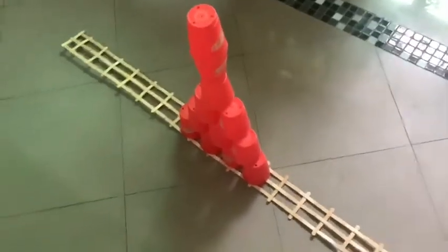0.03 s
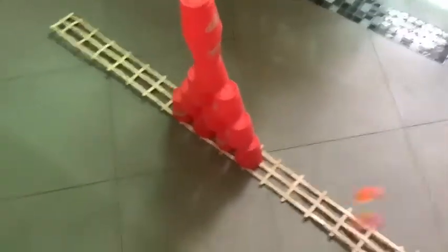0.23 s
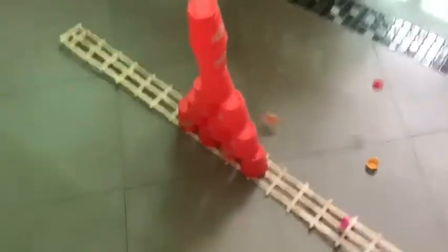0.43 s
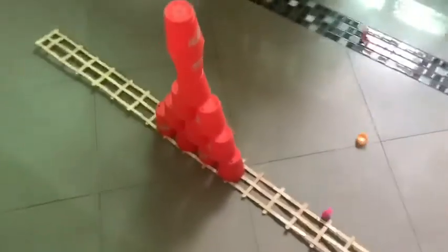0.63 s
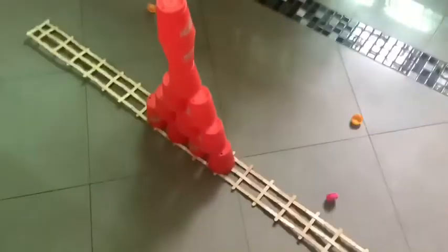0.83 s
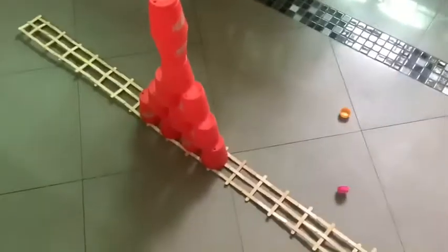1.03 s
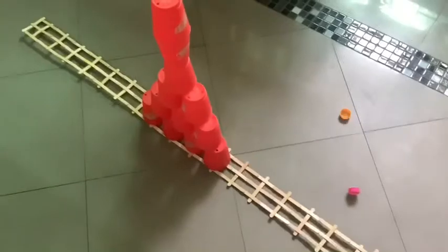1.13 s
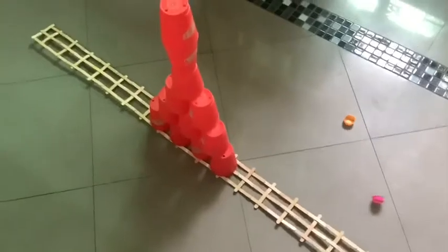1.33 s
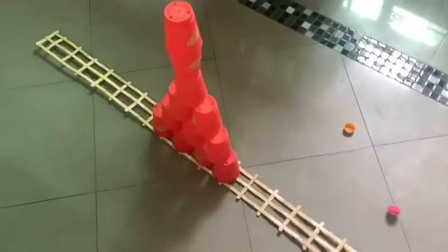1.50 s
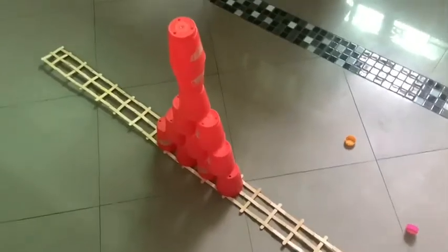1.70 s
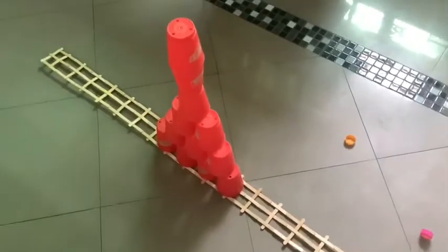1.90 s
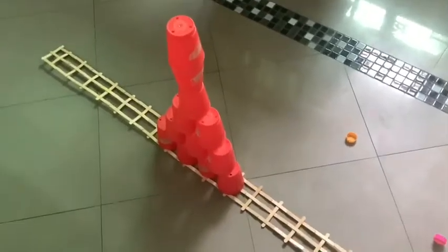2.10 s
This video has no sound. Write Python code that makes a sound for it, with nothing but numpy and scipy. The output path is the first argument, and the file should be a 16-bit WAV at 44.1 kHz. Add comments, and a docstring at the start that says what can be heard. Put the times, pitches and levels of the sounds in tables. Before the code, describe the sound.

Two plastic pieces clatter on tile and bounce to rest in an echoing room.

```python
"""Plastic pieces hit a tiled floor

Two small hard plastic pieces crash down by a toy track of sticks, then bounce apart and settle.
Each rings with its own pitch; hollow knocks, sharp edge ticks and a duller rattle go with them.
The bare room rings for over a second, and the first blows overload the microphone."""
import sys
import numpy as np
from scipy import signal
from scipy.fft import rfft, irfft
from scipy.io import wavfile

SR = 44100
rng = np.random.default_rng(int(sys.argv[2]) if len(sys.argv) > 2 else 0)


def unload_audio(sound):
    """Save the sound as a 16-bit wav file, at the path given as the first command line argument."""
    columns = np.transpose(np.atleast_2d(sound))
    # keep every value between -1 and 1, then stretch to whole-number steps
    steps = np.round(np.clip(columns, -1, 1) * 32767)
    wavfile.write(sys.argv[1], SR, steps.astype(np.int16))


N = 94815
TIME = np.arange(N) / SR
FREQ = np.maximum(np.arange(N + 1) * SR / (2 * N), 1)


def amp(db):
    """Turn decibels into a number to multiply by."""
    return 10 ** (np.asarray(db) / 20)


def unit(x):
    """Scale to an average strength (rms) of one."""
    return x / np.sqrt(np.mean(x ** 2))


def along(points, hz):
    """Read between the rows of a frequency table, with octaves evenly spaced."""
    f, v = np.array(points).T
    return np.interp(np.log(hz), np.log(f), v)


def noise(gain):
    """Noise shaped by a gain for each frequency."""
    return unit(irfft(rfft(rng.standard_normal(2 * N)) * gain)[:N])


def blows(hits, tones, blur, blur_db, blur_fade_s, scatter, size=8192):
    """Each hit rings an object's main tones and a noisy blur of its many weaker ones."""
    # A fade is the time to drop 60 dB. A hit's ring multiplies it: pressed on the tile means shorter.
    # A hit's brightness tilts the sound towards the treble: a soft contact is duller.
    out, t = np.zeros(N + size), TIME[:size]
    hz, db, fade_s = np.array(tones).T[:, :, None]
    centre_hz = hz.mean()
    freq = np.maximum(np.fft.rfftfreq(size, 1 / SR), 1)
    colour = unit(amp(along(blur, freq)))
    octaves = np.clip(np.log2(freq / centre_hz), -1, 2)
    rise = 1 - np.exp(-(t * centre_hz / 1.41) ** 2)  # builds up over 1.41 cycles
    for start, level_db, ring, brightness in hits:
        decay = -np.log(1000) * t / max(ring, .1)
        pitch = hz * (1 + scatter * rng.standard_normal(hz.shape))
        gain = amp(db + brightness * np.log2(hz / centre_hz))
        ringing = gain * np.sin(2 * np.pi * pitch * t) * np.exp(decay / fade_s)
        rough = irfft(rfft(rng.standard_normal(size)) * colour * amp(brightness * octaves))
        rough *= np.exp(decay / blur_fade_s)
        i = int(start * SR)
        out[i:i + size] += amp(level_db) * rise * (ringing.sum(0) + amp(blur_db) * rough)
    return out[:N]


# How long the room's echo takes to drop 60 dB: f/Hz, fade/s
ROOM_FADE = [(200, 0.86), (900, 1.41), (2500, 0.69), (4500, 0.79), (8000, 0.86), (15000, 0.39)]

def room(x, echo_db, direct_db=0, bands=12):
    """The direct sound, strong early echoes off the walls, and a long tail whose top dies first."""
    wall_delay_s, early_s, early_db = 0.007, 0.067, 10.5
    spectrum, tail = rfft(rng.standard_normal(2 * N)), 0
    centres = np.geomspace(150, 16000, bands)
    for hz, share in zip(centres, np.eye(bands)):
        band = irfft(spectrum * np.interp(FREQ, centres, share))[:N]
        tail = tail + band * np.exp(-np.log(1000) * TIME / along(ROOM_FADE, hz))
    tail *= 1 - np.exp(-(TIME / wall_delay_s) ** 2)
    tail *= 1 + amp(early_db) * np.exp(-TIME / early_s)
    echo = signal.fftconvolve(x, unit(tail) / np.sqrt(N))[:N]
    return amp(direct_db) * x + amp(echo_db) * echo


# The shape of the background noise: f/Hz, relative level/dB
AIR_COLOUR = [(25, -8), (45, -4.5), (75, 3.5), (150, 0.5), (310, 2), (600, -2), (1000, -0.5), (1700, -4.5),
              (3200, -18.5), (6000, -19.5), (10000, -22.5), (15500, -30.5)]

def air():
    """Steady room noise with a faint wavering hum."""
    air_db, hum_db, hum_hz = -42, -52, 311.5
    hum = noise(1 / (1 + ((FREQ - hum_hz) / 14) ** 2))
    return amp(air_db) * noise(amp(along(AIR_COLOUR, FREQ))) + amp(hum_db) * hum


# Each clack: t/s, level/dB, ring/times, brightness/(dB per octave)
CLACK_HITS = [(.014, -25, .7, 10), (.2335, -2.5, 2, 26.5), (.263, 6.5, 0.81, 20.5), (.271, -3, 1.3, 19.5),
              (1.335, -14, 1.2, 17.5), (1.482, -22.5, 1.8, -10), (1.537, -18.5, 2.05, -2.5),
              (1.544, -30, 0.77, 20.5), (1.569, -28.5, 1.9, -3), (1.755, -24, 1.2, -8),
              (1.835, -32, 0.59, -2)]
# The sticks' main tones: f/Hz, level/dB, fade/s
STICK_TONES = [(2177, -3, 0.0056), (2480, -2, 0.012), (3070, -1.5, 0.0041)]
# Their weaker tones: f/Hz, level/dB
STICK_BLUR = [(200, -21), (1200, -8), (1900, -5), (2500, 5.5), (3100, 4), (4300, 4), (5400, -18),
              (6500, -42.5), (15000, -49)]

def stick_rattle():
    """Sticks give short, dull clacks: loud in the crash, light as the pieces settle."""
    clacks = blows(CLACK_HITS, STICK_TONES, STICK_BLUR, blur_db=-3, blur_fade_s=0.014, scatter=0.048)
    return room(clacks, echo_db=1.5)


# Each tick: t/s, level/dB, ring/times, brightness/(dB per octave)
EDGE_HITS = [(.029, -48, 1.63, -18), (.398, -17, 0.64, -8), (.655, -47, 1.3, 2), (1.1228, -27, 1.5, -2),
             (1.2803, -31, 1.44, -1), (1.334, -33, 1.3, 6), (1.582, -35, 0.62, -17)]
# The edge's main tones: f/Hz, level/dB, fade/s
EDGE_TONES = [(8350, 0, 0.00545), (10320, -1.5, 0.0058), (12150, 8, 0.003), (13600, 4, 0.0044)]
# Its weaker tones: f/Hz, level/dB
EDGE_BLUR = [(500, -27.5), (3000, -1.5), (5000, -1), (6600, -22.5), (8000, -1.5), (10000, -22.5),
             (13500, -1), (15500, -8)]

def edge_ticks():
    """An edge catches the tile and rings very high and very briefly."""
    ticks = blows(EDGE_HITS, EDGE_TONES, EDGE_BLUR, blur_db=2.5, blur_fade_s=0.012, scatter=0.0293)
    return room(ticks, echo_db=0.5)


# The lower piece's bounces: t/s, level/dB, ring/times, brightness/(dB per octave)
LOW_HITS = [(.0478, -17, 0.2, 2), (.0528, -28, 0.2, -28), (.209, -26, 2.4, 5), (.2172, 11.5, 1.06, 9.5),
            (.222, 8.5, 0.46, 10), (.2305, 12.5, 0.68, -11.5), (.249, 7, 0.74, -0.5),
            (.256, -2.5, 0.36, 8.5), (.279, 1.5, 0.46, 13), (.481, -10, 1.9, 5), (.4862, -4.5, 1.9, 3.5),
            (.4945, -3, 1.34, 7), (.592, -2.5, 0.73, 0), (.683, -16.5, 1.24, -9), (.8675, -13, 0.46, -13),
            (.9818, -10, 0.63, 4.5), (1.03, -13, 0.39, -3), (1.1455, -19, 0.9, -24),
            (1.2232, -18.5, 1.2, -16), (1.285, -12, 0.74, -18.5)]
# Its main tones: f/Hz, level/dB, fade/s
LOW_TONES = [(3250, -16.5, .012), (3929, -13.5, 0.042), (4145, -0.5, 0.036), (4256, -4.5, 0.036),
             (4360, -27.5, 0.018)]
# Its weaker tones: f/Hz, level/dB
LOW_BLUR = [(150, -18), (1200, -20.5), (2300, -13), (3100, 2), (4300, 4), (5500, -4.5), (6300, -10.5),
            (7800, -11), (9100, -7.5), (10800, -15), (12200, -13), (13300, -14), (15500, -14)]
# Its sound straight to the microphone: t/s, level/dB
LOW_DIRECT = [(.5, -0.5), (.8, -2), (1.3, -2.5)]

def low_piece():
    """The lower-pitched piece rings at each bounce; its direct sound weakens as it skitters off."""
    bounces = blows(LOW_HITS, LOW_TONES, LOW_BLUR, blur_db=-7.5, blur_fade_s=0.017, scatter=0.012)
    return room(bounces, echo_db=-2, direct_db=np.interp(TIME, *np.array(LOW_DIRECT).T))


# Each knock: t/s, level/dB, ring/times, brightness/(dB per octave)
KNOCK_HITS = [(.218, -3, 0.69, 12), (.25, -9, 1.18, -13), (.29, -9, 0.82, 12), (.418, -21, 1.1, -4),
              (.44, -19.5, 1.25, -3.5), (.474, -24, 1.16, -2), (.502, -26.5, 1.2, -21), (.6, -34, 1.4, -13),
              (.708, -31, 1.24, 3), (1.462, -25, 1.09, -2)]
# The main hollow tones: f/Hz, level/dB, fade/s
KNOCK_TONES = [(624, -5.5, .04), (757, 6, 0.032), (903, 1, 0.036)]
# The weaker tones: f/Hz, level/dB
KNOCK_BLUR = [(100, -17.5), (300, -12.5), (550, 3.5), (800, 10), (1050, -2.5), (1400, -6), (3000, -26),
              (8000, -42.5)]

def hollow_knocks():
    """Blows that ring with deeper, hollow tones, loudest in the crash."""
    knocks = blows(KNOCK_HITS, KNOCK_TONES, KNOCK_BLUR, blur_db=-1, blur_fade_s=0.031, scatter=0.055)
    return room(knocks, echo_db=-3)


# The higher piece's bounces: t/s, level/dB, ring/times, brightness/(dB per octave)
HIGH_HITS = [(.231, 3, 1.2, 8.5), (.252, 16, 0.36, 19), (.5377, 5, 2.1, -0.5), (.5421, 0.5, .6, 19.5),
             (.5475, -5.5, 0.8, -10), (.8069, -5, 1.65, -1), (.8094, -0.5, 0.83, 9.5),
             (.9256, -10.5, 1.2, 7), (.9276, -2, 0.8, 0), (.9893, -5.5, 1.7, -6), (1.055, -21.5, 2.1, 11),
             (1.3341, -4.5, 1.05, -5.5), (1.349, -13, 0.42, -24.5), (1.481, -23, 0.65, -9),
             (1.6103, -21.5, 2.1, -12), (1.744, -30.5, 0.83, 8)]
# Its main tones: f/Hz, level/dB, fade/s
HIGH_TONES = [(3790, -25.5, 0.0055), (4500, -9.5, .012), (5068, -5, 0.018), (5171, -7, 0.037)]
# Its weaker tones: f/Hz, level/dB
HIGH_BLUR = [(150, -37), (1200, -12.5), (2500, -8), (3700, 3.5), (5200, 10), (6100, -39), (7400, -12),
             (8400, -5), (9900, -15.5), (11000, -26), (12050, -16), (13000, -35.5), (15400, -21.5)]

def high_piece():
    """The higher-pitched piece lands hard, then rings more softly as it bounces to rest."""
    bounces = blows(HIGH_HITS, HIGH_TONES, HIGH_BLUR, blur_db=-9.5, blur_fade_s=0.023, scatter=0.008)
    return room(bounces, echo_db=-3)


# The tumble's loudness and middle pitch: t/s, level/dB, f/Hz
TUMBLE = [(1.0, -36, 3650), (1.12, -41.5, 3350), (1.189, -46, 3260), (1.22, -35, 3310), (1.321, -33, 3340),
          (1.42, -39.5, 3370), (1.50, -33.5, 2700), (1.56, -40.5, 2560), (1.62, -43, 2492),
          (1.72, -46, 2780), (1.77, -46.5, 2860), (1.86, -47, 2400), (1.91, -67, 2370)]

def tumble(size=512):
    """A tumbling rim makes tiny, uneven taps on the tile, duller as it slows."""
    taps_per_s, scatter_db, fade_s = 240, 5.5, 0.0043
    when, db, centre_hz = np.array(TUMBLE).T
    taps, t = np.zeros(N + size), TIME[:size]
    swell_and_fade = t * np.exp(-np.log(1000) * t / fade_s)
    count = int((when[-1] - when[0]) * taps_per_s)
    for k, (late, strength, detune) in enumerate(rng.standard_normal((count, 3))):
        start = when[0] + (k + 0.45 * late) / taps_per_s
        hz = np.interp(start, when, centre_hz) * np.exp(0.16 * detune)
        i = int(start * SR)
        taps[i:i + size] += amp(scatter_db * strength) * np.sin(2 * np.pi * hz * t) * swell_and_fade
    taps /= np.std(taps[int(when[0] * SR):int(when[-1] * SR)])
    return room(taps[:N] * amp(np.interp(TIME, when, db)), echo_db=0.5)


# The scrape's loudness: t/s, level/dB
SCRAPE_LEVEL = [(2.009, -67), (2.045, -50), (2.071, -49.5), (2.084, -51), (2.105, -55), (2.15, -60.5)]

def scrape():
    """A sliding piece makes a thin, faint hiss that rises in pitch."""
    start_hz, rise_hz_per_s, width_hz = 5550, 1700, 1360
    when, db = np.array(SCRAPE_LEVEL).T
    hz = start_hz + rise_hz_per_s * np.maximum(TIME - when[0], 0)
    low_noise = noise(1 / (1 + (2 * FREQ / width_hz) ** 4))
    hiss = low_noise * np.sin(2 * np.pi * np.cumsum(hz) / SR)  # moves the noise up to that pitch
    return unit(hiss) * amp(np.interp(TIME, when, db)) * (TIME > when[0])


def scene():
    """All the sounds add up at one microphone."""
    faint_sounds = air() + scrape()
    pieces = low_piece() + high_piece() + edge_ticks()
    clatter = hollow_knocks() + stick_rattle() + tumble()
    return (faint_sounds + pieces + clatter)[None]


def record(dry):
    """The overloaded microphone flattens the loudest peaks; then the highest treble is cut off."""
    top_hz = 15720
    clipped = np.clip(dry, -1, 1)
    return signal.sosfilt(signal.ellip(10, .1, 70, top_hz, fs=SR, output="sos"), clipped)


dry = scene()
out = record(dry)
unload_audio(out)
```